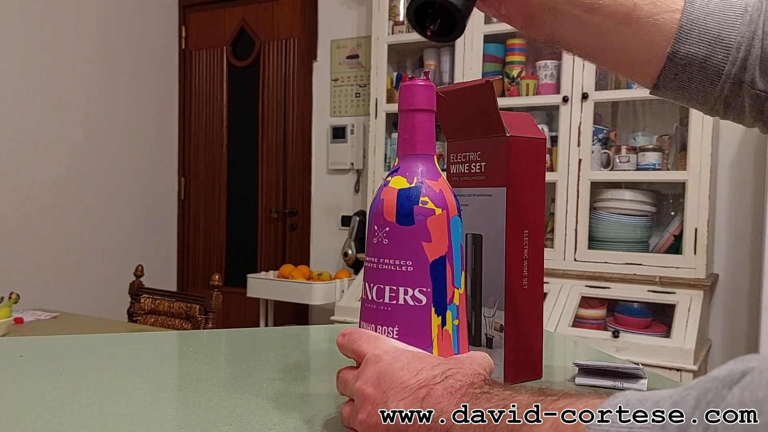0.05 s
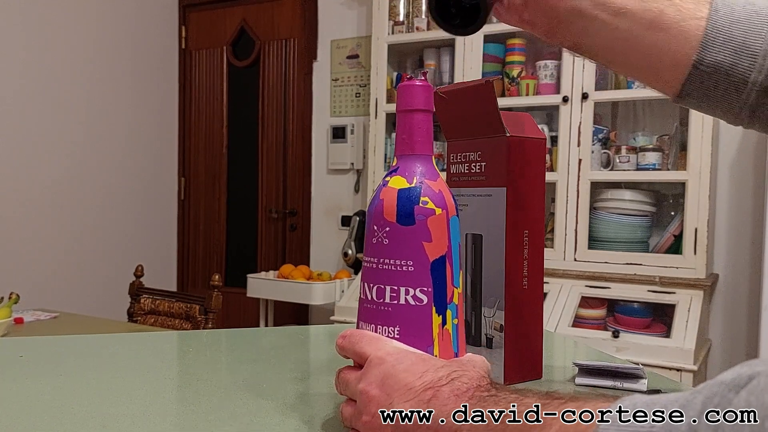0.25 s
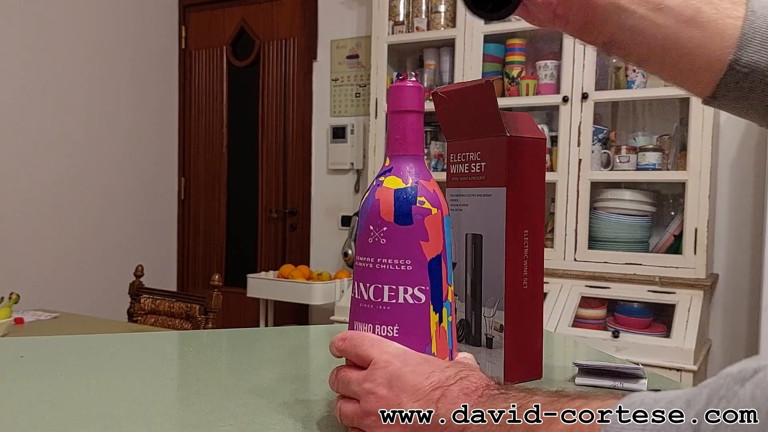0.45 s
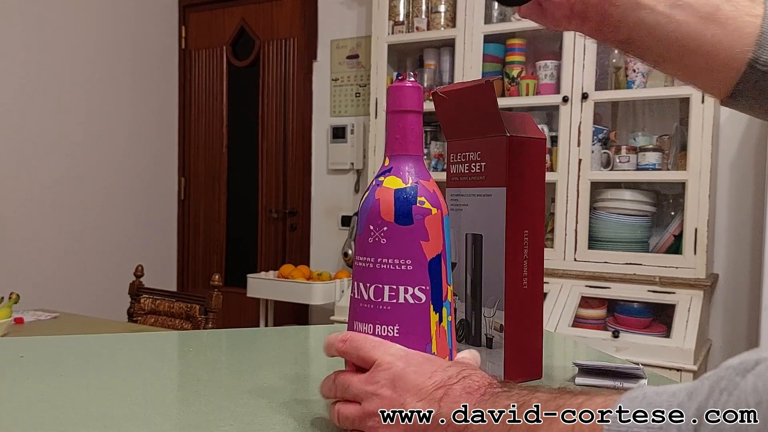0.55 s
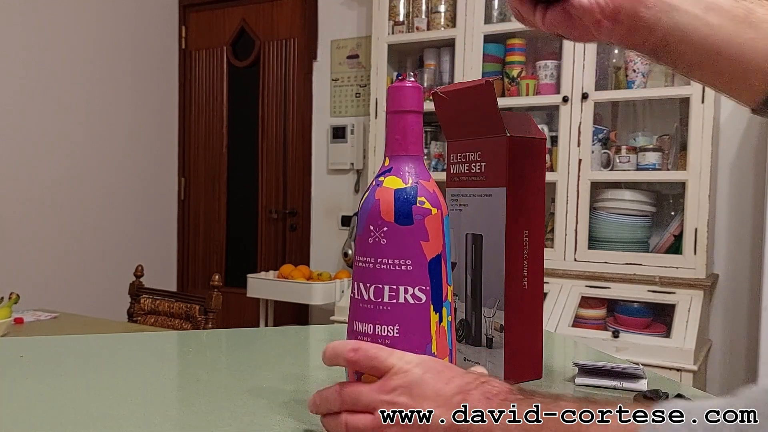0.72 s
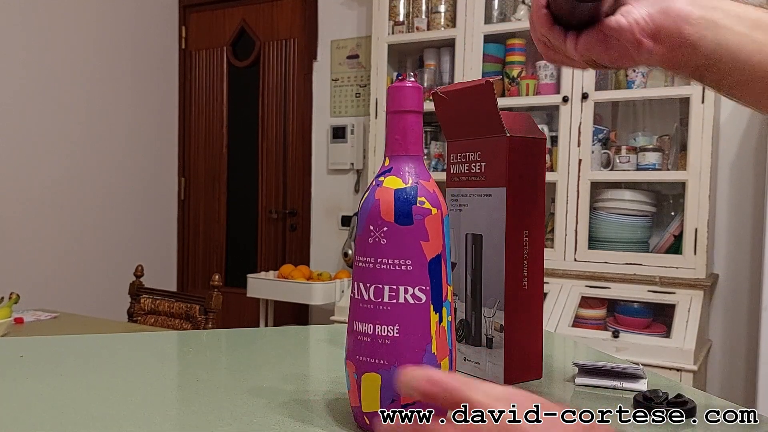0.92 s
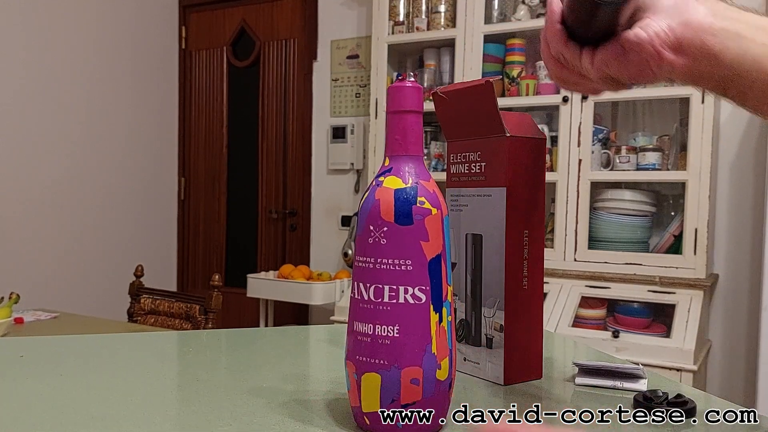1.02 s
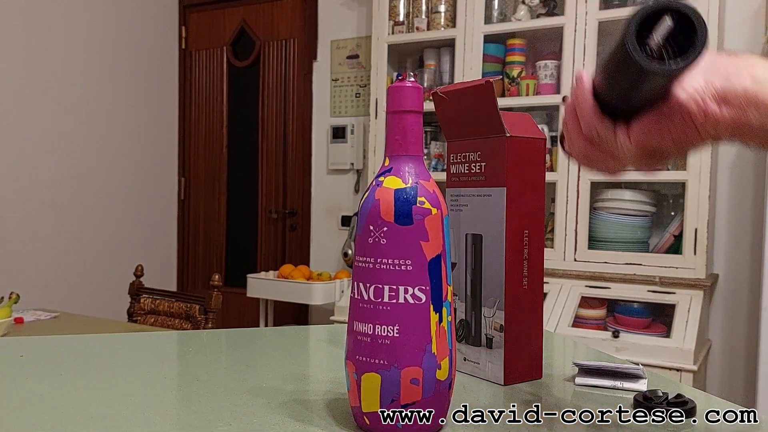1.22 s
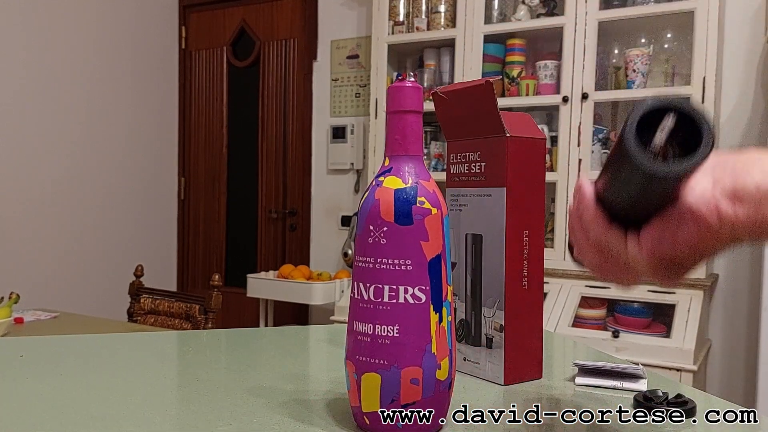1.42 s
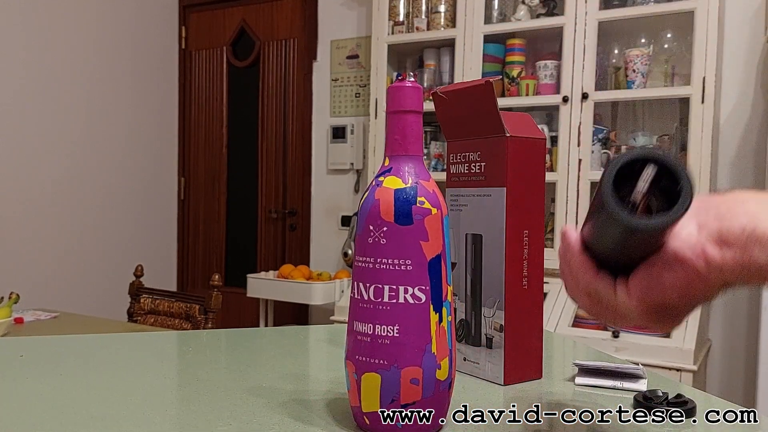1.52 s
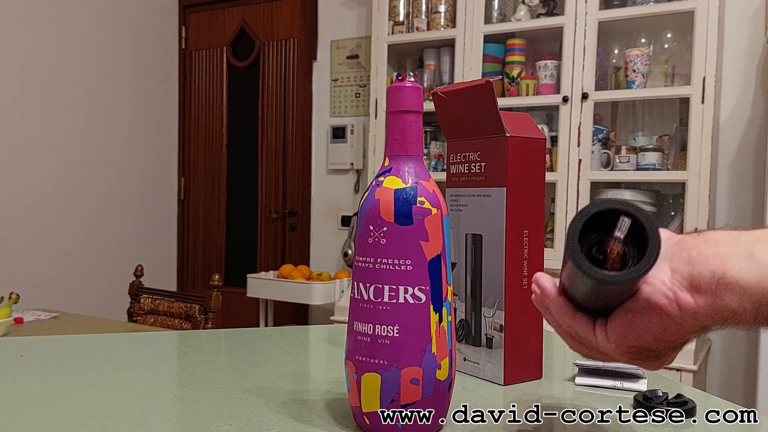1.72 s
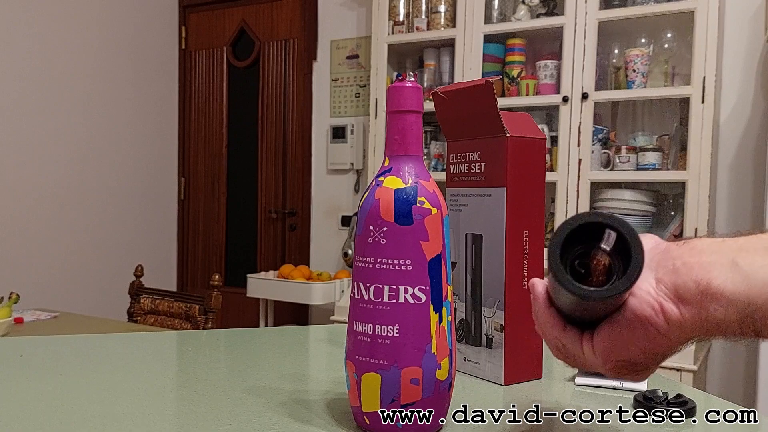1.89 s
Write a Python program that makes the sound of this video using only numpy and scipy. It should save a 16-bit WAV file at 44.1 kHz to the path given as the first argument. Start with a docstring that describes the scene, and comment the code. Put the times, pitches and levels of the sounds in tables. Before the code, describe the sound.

A glass bottle rocks on a table, knocking quickly from about 0.1 seconds, hardest near 0.4, and settling by 0.6. Each knock is a thud with a short ring of glass and tabletop and a low boom in the room. A hand and sleeve rub faintly around 0.9 seconds and again from 1.4 to 1.9. A faint appliance hum and quiet room noise continue throughout.

```python
"""A bare dining room: a glass bottle rocks on a table, knocks three times, each harder, then settles.
Each contact rings the table top and the glass, heard mostly by way of the room, with a thud and a
low boom. A hand slides away and a sleeve brushes faintly, as swells of friction noise.
A household appliance hums over quiet room noise."""
import sys
import numpy as np
from scipy import signal
from scipy.io import wavfile

SR = 44100
rng = np.random.default_rng(int(sys.argv[2]) if len(sys.argv) > 2 else 0)


def output_pcm(signal):
    """Save a mono or channel-first signal as 16-bit PCM at the path in sys.argv[1].

    Samples are clipped to [-1, 1] before scaling.
    """
    pcm = np.clip(np.atleast_2d(signal).T, -1, 1) * 32767
    wavfile.write(sys.argv[1], SR, np.round(pcm).astype(np.int16))


N = 85995
T = np.arange(N) / SR
SPLIT = np.array([[.5], [-.5]])  # half a left-right difference to each channel

# Likeness of the room's two channels. Each row: frequency in Hz, correlation.
CORRELATION = [(40, 1), (120, 0.32), (220, 1), (400, 0.42), (700, 0.28), (1400, 0), (15000, 0.011)]
# Quiet room spectrum. Each row: frequency in Hz, relative density in dB, left minus right in dB.
ROOM_NOISE = [(30.4, -20.5, 2), (50, -10.5, 14), (80, -10.5, 17), (133, -12.5, 16), (220, -3, 9.5),
              (357, -5.5, -0.5), (527, -5, -3.5), (690, -14, -0.5), (1020, -9, -0.5), (1530, -13, 1.5),
              (2300, -26, 3.5), (2960, -32, 0), (5640, -37, 1.5), (6600, -33.5, 6), (8350, -35.5, 4),
              (10600, -41, 0), (15400, -38.5, -11)]


def bottle_knocks():
    """Each knock rings table, glass and room; a softer contact is duller."""
    # Each row: start in seconds, level in dB, low-pass corner in Hz, table, glass and boom gains
    # in dB, boom delay in seconds.
    contacts = [(0.112, -18.5, 2980, -19.5, -10, 6.5, .019), (0.222, -9.5, 2500, 2.5, -2, -1, 0.037),
                (0.263, -10, 2460, 0, 1, -8, .02), (0.386, -0.5, 9000, 2.5, 2, 3, 0.045),
                (0.453, -8, 9000, 0.5, 5, 0, 0.028), (0.533, -20.5, 1140, 6.5, 15, -10.5, 0.005),
                (0.6, -30, 905, 6.5, -6, 18, 0.0023)]
    # Modes of table top, bottle and table-room boom. Each row: pitch in Hz, gain in dB, T60 in seconds.
    table_modes = [(382.7, -12, 0.22), (484, 4.5, 0.38), (518.1, -7, 0.39), (597.6, -3.5, 0.19),
                   (632.5, -1.5, 0.26), (676, -6, 0.44), (696, -2, 0.36), (717, -4.5, 0.5),
                   (767, -20, 0.61), (797, -8.5, 0.45), (873, -4.5, 0.31), (1084, -12.5, 0.16),
                   (1225, -6, 0.21), (1290, -14, 0.14)]
    glass_modes = [(1860, -1.5, 0.26), (1888, 1, 0.39), (2103, -5.5, 0.41), (2390, -22, 0.33),
                   (2702, -23.5, 0.74), (3627, -19, .4), (3625, -22, 0.43), (5110, -38.5, 0.39),
                   (6234, -23, 0.7), (8500, -28, 0.76), (8900, -25.5, 0.33), (11800, -26, 0.43)]
    boom_modes = [(90.7, -9, 0.65), (130, -7, 0.57), (163, -5.5, 0.48), (195.5, -2.5, 0.44),
                  (237.4, -10.5, .4)]
    out, bands = 0, noise_bands()
    for start_s, db, corner_hz, table_db, glass_db, boom_db, boom_delay_s in contacts:
        table = from_db(table_db - 26) * ring(table_modes, swell_s=0.0092, scatter_db=-3, width=0.023)
        glass = from_db(glass_db - 37.5) * ring(glass_modes, swell_s=0.0013, scatter_db=0, width=0.025)
        boom = from_db(boom_db - 41) * ring(boom_modes, swell_s=0.002, scatter_db=0.5, width=0.028)
        hit = thud(bands) + delayed(table, 0.008) + glass + delayed(boom, boom_delay_s)
        pole = np.exp(-2 * np.pi * corner_hz / SR)
        dulled = signal.lfilter([(1 - pole) ** 2], [1, -2 * pole, pole ** 2], hit)
        out = out + from_db(db) * delayed(dulled, start_s)
    return out


def ring(modes, swell_s, scatter_db, width):
    """Struck modes: a steady tone plus a room-scattered part, its width a fraction of the pitch."""
    out = 0
    for hz, db, t60_s in modes:
        alike = np.clip(at_hz(CORRELATION, hz), 0, 1)
        phase = rng.uniform(0, 2 * np.pi) + np.arccos(alike) * rng.choice([-1, 1]) * SPLIT
        paths = np.array([drift(width * hz) + 1j * drift(width * hz) for _ in range(3)]) / np.sqrt(2)
        scattered = np.sqrt(alike) * paths[0] + np.sqrt(1 - alike) * paths[1:]
        tone = (np.exp(1j * phase) + from_db(scatter_db) * scattered) * np.exp(2j * np.pi * hz * T)
        out = out + knock_pan(hz) * from_db(db) * swell_and_decay(swell_s, t60_s) * tone.real
    return out / np.hypot(1, from_db(scatter_db))


def thud(bands):
    """Broadband part of a knock: short slaps off near surfaces and a diffuse tail."""
    # Each row: frequency in Hz, relative density in dB.
    spectrum = [(30, -45), (70, -29.5), (130, -15.5), (250, -4), (450, 2), (800, -1), (1000, -9),
                (1300, -9), (1550, -26.5), (2200, -25.5), (3100, -59), (4500, -47), (8500, -52.5),
                (10000, -54.5), (15000, -56.5)]
    # Each row: frequency in Hz, T60 in seconds, build-up in seconds.
    reverb = [(102, 0.52, .035), (500, 0.37, 0.022), (1300, 0.36, 0.019), (3040, 0.73, .003),
              (10000, .5, 0.0015)]
    # Off table and walls. Each row: delay in seconds, gain in dB.
    reflections = [(0.02, -5), (.034, -18), (.1, 5), (.15, 4.5)]
    shift = rng.integers(0, N // 2)
    steady, tail = 0, 0
    for hz, noise in bands:
        band = np.roll(noise, -shift, axis=1) * knock_pan(hz) * from_db(at_hz(spectrum, hz))
        steady = steady + band
        tail = tail + band * swell_and_decay(at_hz(reverb, hz, column=2), at_hz(reverb, hz))
    slap = steady * swell_and_decay(swell_s=0.0018, t60_s=0.037)
    slaps = sum(from_db(db) * delayed(slap, delay_s) for delay_s, db in reflections)
    return (from_db(-22) * tail + from_db(-33) * slaps) / steady.std()


def knock_pan(hz):
    """Left and right gains of a knock at one frequency."""
    # Each row: frequency in Hz, left minus right in dB.
    balance = [(200, 0), (400, -3.5), (700, 0), (1300, 0), (2000, -2), (4000, -2.5), (7000, 8.5),
               (12000, -2.5)]
    return from_db(at_hz(balance, hz) * SPLIT)


def rubs(bands):
    """Bottle, hand and sleeve sliding: swells of friction noise coloured by the room."""
    # Each row: centre in seconds, half length in seconds, level in dB, centre in Hz, width in octaves.
    strokes = [(0.27, 0.12, -79, 7370, 0.61), (0.952, 0.26, -81.5, 13050, 0.85),
               (0.903, 0.06, -66, 700, 3.1), (1.43, 0.03, -63, 655, 1.3), (1.587, 0.04, -59, 256, 1.4),
               (1.659, 0.056, -79, 7870, 0.68), (1.865, 0.027, -76.5, 6900, 0.97),
               (1.89, 0.026, -71.5, 1510, 1.3)]
    out, flutter_db = 0, 1.0
    for centre_s, half_s, db, centre_hz, octaves in strokes:
        friction = sum(band * from_db(at_hz(ROOM_NOISE, hz)) * gaussian(np.log2(hz / centre_hz), octaves)
                       for hz, band in bands)
        envelope = from_db(db + flutter_db * drift(25)) * gaussian(T - centre_s, half_s)
        out = out + envelope * unit_rms(friction)
    return out


def appliance_hum():
    """Faint tones, slightly unsteady in pitch and level."""
    # Each row: frequency in Hz, rms level in dB.
    tones = [(139, -68.5), (306.5, -65.5), (523, -71.5), (611, -77.5), (920, -82), (1922, -89.5)]
    out, wander_hz, waver_db = 0, 1.18, 1.2
    for hz, db in tones:
        phase = 2 * np.pi * np.cumsum(hz + wander_hz * drift(5.5)) / SR
        out = out + np.sqrt(2) * from_db(db + waver_db * drift(9)) * np.sin(phase)
    return out


def room_tone():
    """Steady noise of the quiet room, its bass to the left."""
    out = 0
    for hz, band in noise_bands():
        db = at_hz(ROOM_NOISE, hz) + at_hz(ROOM_NOISE, hz, column=2) * SPLIT
        out = out + band * from_db(db)
    return from_db(-61.5) * unit_rms(out)


def noise_bands():
    """Third-octave noise with the room's stereo correlation, as (centre in Hz, samples) pairs."""
    edges_hz = 25 * 2 ** (np.arange(29) / 3)
    white, bands = rng.standard_normal((2, 2, N)), []
    for k, (low, high) in enumerate(zip(edges_hz, edges_hz[1:])):
        bandpass = signal.butter(2, [low, high], "band", fs=SR, output="sos")
        mid, side = signal.sosfilt(bandpass, white[k % 2])
        hz = np.sqrt(low * high)
        alike = np.clip(at_hz(CORRELATION, hz), -1, 1)
        bands.append((hz, np.sqrt(1 + alike) * mid + np.sqrt(1 - alike) * side * 2 * SPLIT))
    return bands


def drift(rate_hz):
    """Smooth random motion, rms about 1."""
    hop, warmup = 40, 2000
    pole = np.exp(-2 * np.pi * rate_hz * hop / SR)
    white = rng.standard_normal(N // hop + warmup + 2)
    slow = signal.lfilter([1], [1, -2 * pole, pole * pole], white)[warmup:]
    return np.interp(np.arange(N) / hop, np.arange(len(slow)), unit_rms(slow))


def swell_and_decay(swell_s, t60_s):
    return (1 - np.exp(-T / max(swell_s, 1e-4))) * np.exp(-np.log(1000) * T / t60_s)


def gaussian(offset, sigma):
    return np.exp(-.5 * (offset / sigma) ** 2)


def delayed(x, delay_s):
    return np.pad(x, ((0, 0), (max(int(delay_s * SR), 0), 0)))[:, :N]


def at_hz(rows, hz, column=1):
    """Interpolate a table column over log frequency."""
    rows = np.array(rows)
    return np.interp(np.log(hz), np.log(rows[:, 0]), rows[:, column])


def from_db(db):
    return 10 ** (np.asarray(db) / 20)


def unit_rms(x):
    return x / np.sqrt(np.mean(x ** 2) + 1e-20)


def scene():
    """Knocks and rubs over hum and room tone."""
    background = room_tone()
    return bottle_knocks() + rubs(noise_bands()) + appliance_hum() + background


def record(dry):
    """Steep elliptic low-pass."""
    cutoff_hz = 15800
    return signal.sosfilt(signal.ellip(10, .1, 70, cutoff_hz, fs=SR, output="sos"), dry)


dry = scene()
out = record(dry)
output_pcm(out)
```